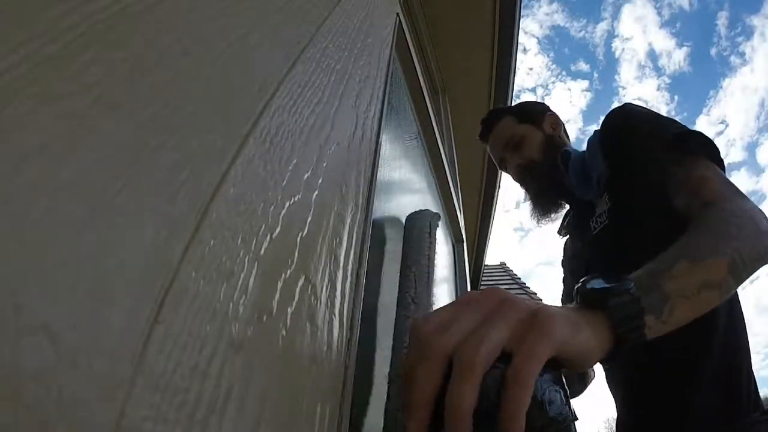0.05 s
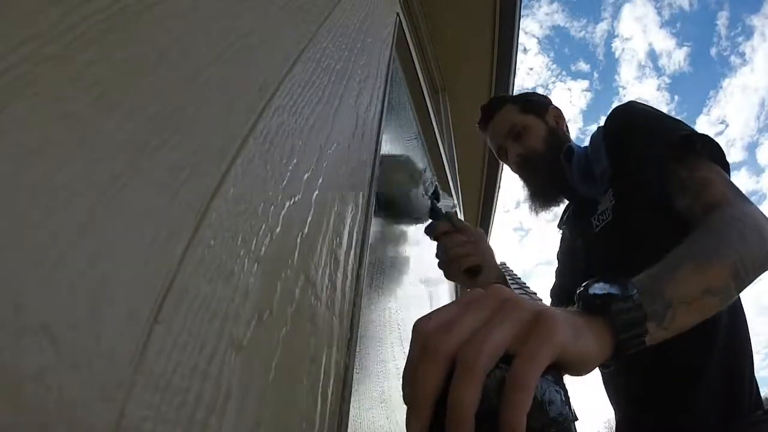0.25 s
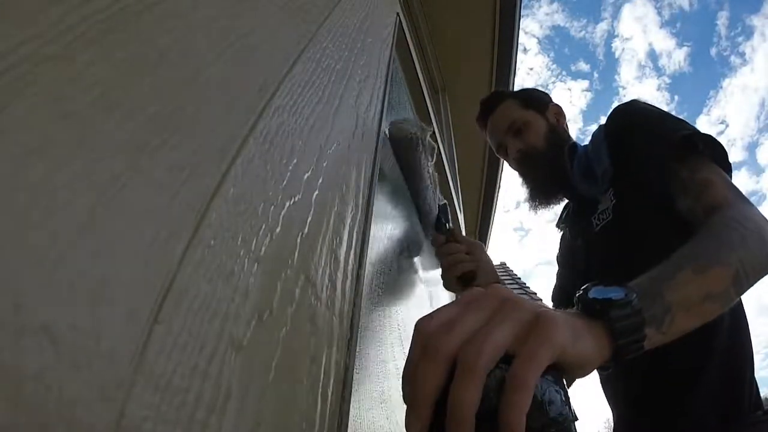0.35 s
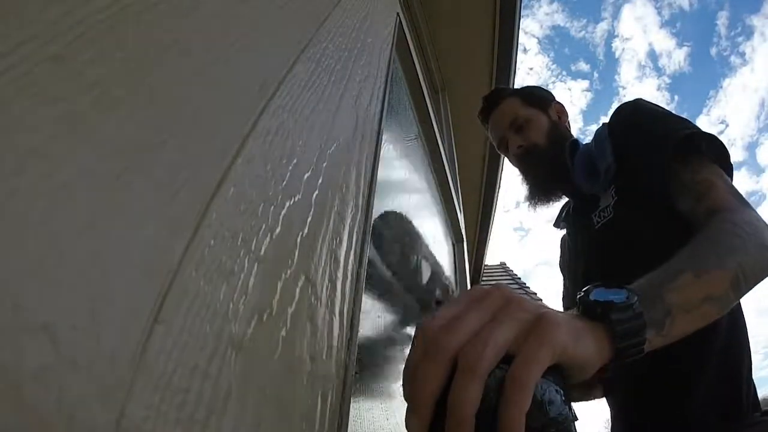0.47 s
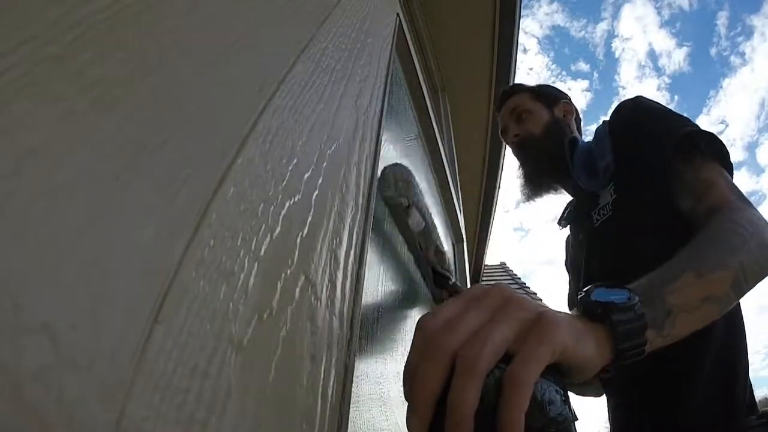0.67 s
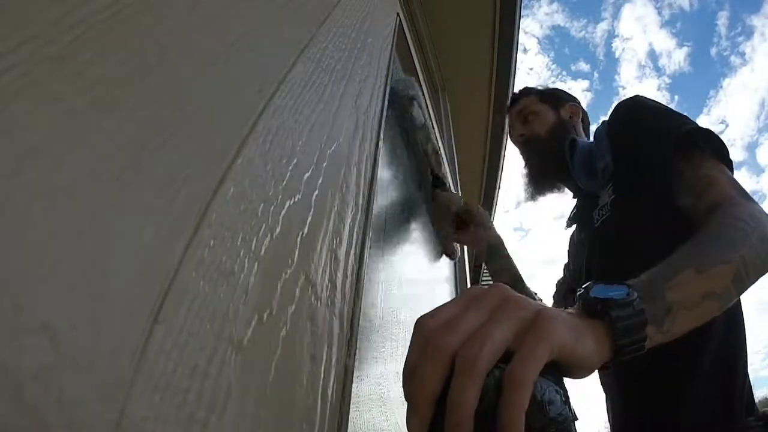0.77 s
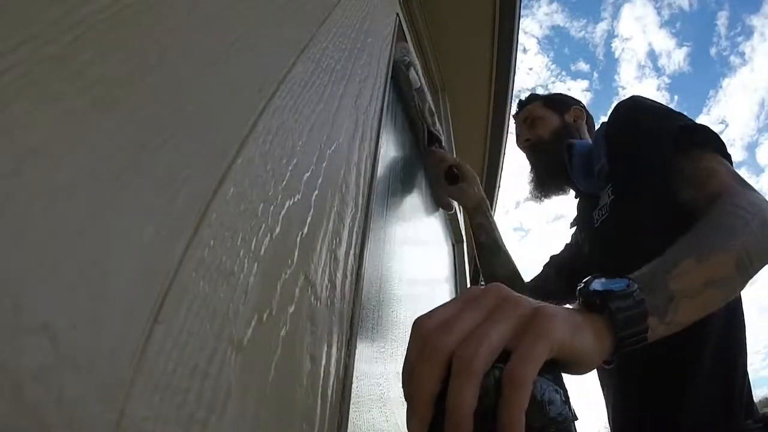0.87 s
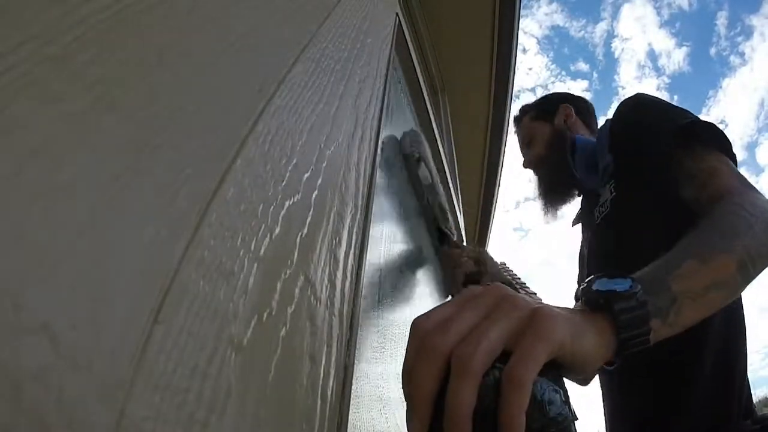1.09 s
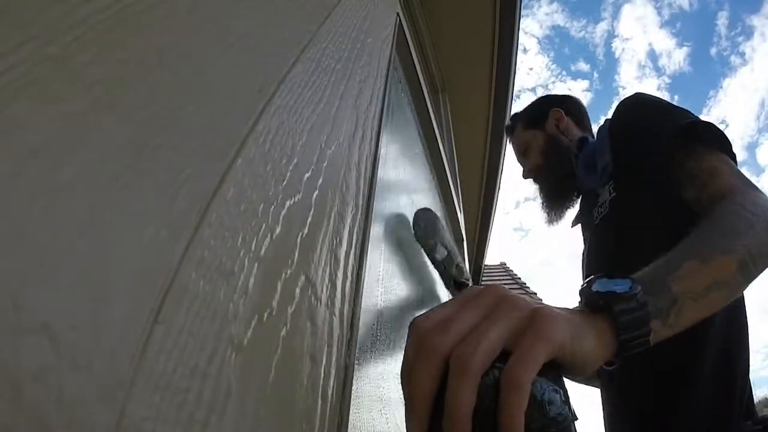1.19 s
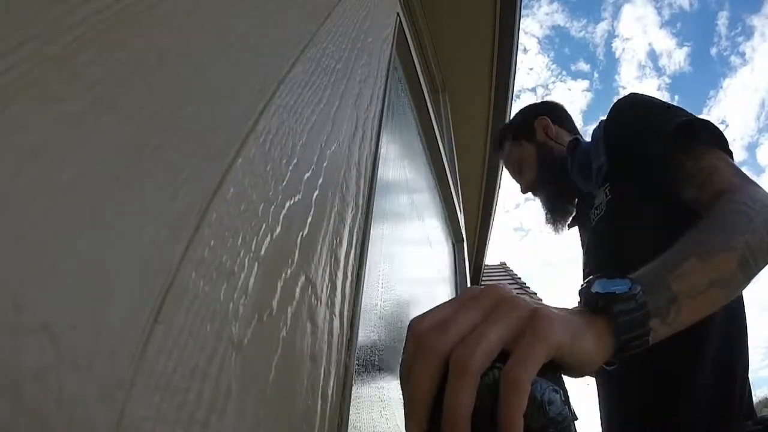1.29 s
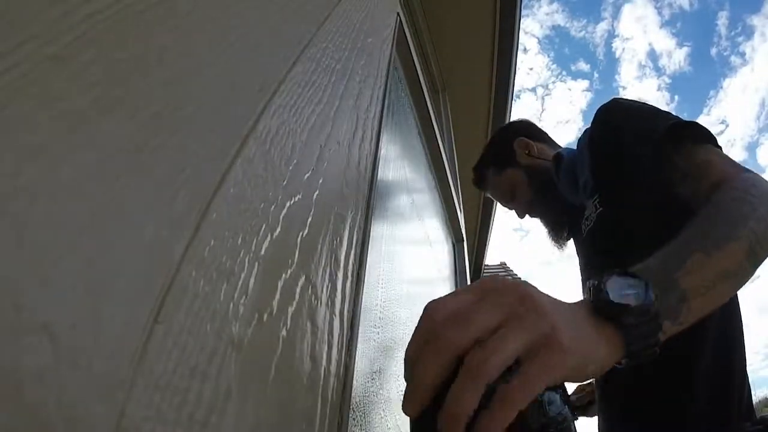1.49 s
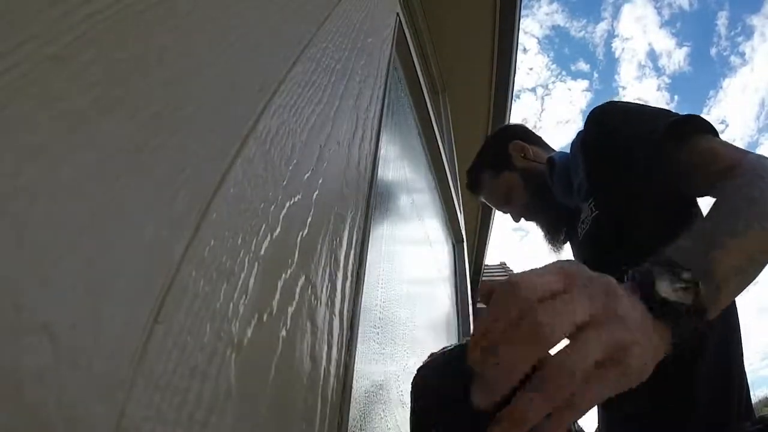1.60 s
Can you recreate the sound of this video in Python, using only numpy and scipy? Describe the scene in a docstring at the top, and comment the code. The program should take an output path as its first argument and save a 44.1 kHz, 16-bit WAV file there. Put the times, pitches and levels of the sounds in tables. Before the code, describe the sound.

Close, wet scrubbing strokes on window glass outdoors. The first swish ends in a deep thump; more strokes follow with light squeaks and low drumming, then a loud and a soft knock against the frame and one last swish.

```python
"""A wet washer pad is swept up and down a large window pane, in faint outdoor air.
From the start, friction of its fibres excites the resonances of tool and glass while the pane drums.
The first stroke squeezes out a fine spray, and its turn thumps the pane at 0.25 s. After the second
the pad glides with a thin hiss and faint squeaks, then rubs through two more strokes. Near 1.4 s the
tool knocks twice on the frame, loudly then softly, as the pane booms again; a last stroke follows."""
import sys
import numpy as np
from scipy import signal
from scipy.fft import rfft, irfft
from scipy.io import wavfile

SR = 44100
rng = np.random.default_rng(int(sys.argv[2]) if len(sys.argv) > 2 else 0)


def int16_out(signal):
    """Quantize to a 16-bit WAV file."""
    q = np.round(np.clip(np.atleast_2d(signal).T, -1, 1) * 32767)
    wavfile.write(sys.argv[1], SR, q.astype(np.int16))


N = 72765
TIME = np.arange(N) / SR

# spectrum of the outdoor air: frequency_hz, relative_db
AIR_SPECTRUM = [(20, -28), (30, -5), (42, 4.5), (55, -11.5), (70, -22), (180, -16.5), (280, -24),
                (700, -29), (1600, -30.5), (2600, -39.5), (3600, -35.5), (5000, -42), (9000, -48.5),
                (14000, -56.5)]
# envelope of the spray squeezed from the pad: time_s, level_db
SPRAY_ENVELOPE = [(0, -74), (.09, -65.5), (.2, -66), (.255, -66), (.29, -69)]
# spectrum of the spray: frequency_hz, relative_db
SPRAY_SPECTRUM = [(2500, -17.5), (5500, 3), (7000, -9), (9000, -8.5), (12500, -18), (15000, -30.5)]
# wet ticks of the pad: start_s, level_db, centre_hz, width_hz
WET_TICKS = [(0.213, -46, 4000, 3030), (0.254, -46, 2970, 3050), (0.432, -39.5, 2370, 1800),
             (.52, -47, 4400, 900), (0.955, -35.5, 2770, 1300), (1.051, -40, 3200, 1000)]
# envelope of the light sliding between strokes: time_s, level_db
GLIDE_ENVELOPE = [(.4, -62), (.53, -59), (.6, -65), (.7, -63), (.79, -64)]
# spectrum of that sliding: frequency_hz, relative_db
GLIDE_SPECTRUM = [(1500, -8), (2700, -7), (3450, 1), (4300, -11), (6000, -17.5), (12000, -43)]
# stick-slip squeaks: start_s, length_s, start_hz, end_hz, level_db
PAD_SQUEAKS = [(0.513, 0.053, 2830, 3240, -65), (0.681, 0.059, 4250, 3810, -69),
               (0.74, 0.077, 3780, 2620, -61), (0.986, 0.14, 1673, 1690, -48.5),
               (1.111, 0.0664, 1028, 912, -43.5), (1.129, 0.075, 1742, 1680, -44.5)]
# low modes of the pane: pitch_hz, boom_t60_s, pushed_db, rubbed_db
PANE_MODES = [(41.4, 0.75, -8, -3), (53.3, 0.17, -15.5, -6), (120.4, .5, -6.5, 1), (129.3, 0.7, 0, -3.5),
              (156.5, 0.53, -32.5, -2), (181, 0.23, -24.5, -2), (202.55, 0.29, -0.5, -3),
              (321, 0.09, -15.5, -22.5)]
# envelope of the rubbed pane's drumming: time_s, level_db
DRUM_ENVELOPE = [(0, -41), (.1, -37), (.18, -44.5), (.4, -38), (.63, -47.5), (.78, -59.5), (.815, -36),
                 (1.0, -34.5), (1.1, -45), (1.16, -35), (1.33, -56), (1.42, -38.5), (1.58, -38),
                 (1.65, -41.5)]
# pushes on the pane: full_force_s, level_db, rise_s
PANE_PUSHES = [(.252, -12.5, 0.052), (1.405, -24.5, 0.039)]
# shudders of the pane as the pad catches: start_s, length_s, pitch_hz, peak_db
PANE_SHUDDERS = [(.207, 0.049, 49.5, -22), (.212, 0.057, 189.3, -14), (.222, 0.088, 124.5, -10),
                 (.272, 0.033, 188, -18.5), (.797, 0.023, 196.3, -38), (1.005, 0.024, 143, -25.5),
                 (1.37, 0.029, 155.4, -24), (1.398, .042, 167.5, -25.5), (1.405, 0.14, 124.9, -19),
                 (1.565, 0.087, 121.5, -33)]
# knocks of the tool on the frame: start_s, ring_db, crack_db, rebound_db, treble_lift_db
FRAME_KNOCKS = [(1.3707, -9, -13.5, -4, -1.5), (1.4475, -30.5, -29.5, -8, 7.5)]
# modes of tool and frame: pitch_hz, relative_db, t60_s
FRAME_MODES = [(334, -22, 0.1), (487, -39, 0.16), (648, -29, 0.098), (832, -19.5, 0.12),
               (1017, -25.5, 0.18), (991, -19.5, 0.072), (1173, -7, 0.075), (1380, -9, 0.046),
               (1404, -13, 0.094), (1560, -11, 0.077), (1735, -33, 0.065), (1862, -23.5, 0.19),
               (2200, -30.5, .05), (2450, -10, 0.037), (2713, -16.5, .05), (3260, -30.5, 0.1),
               (3530, -19, .035), (4070, -42, .035)]
# spectrum of a knock's crack: frequency_hz, relative_db
CRACK_SPECTRUM = [(200, 5), (430, -19), (730, -28), (1090, 8.5), (1400, 9.5), (2000, -4), (2600, -4.5),
                  (3100, -11), (4000, -9.5), (5200, -24.5), (7000, -42), (11000, -66), (15000, -58)]
# strokes of the pad: grip (0 gliding, 1 biting), envelope of (time_s, level_db)
PAD_STROKES = [ (0.021, [(0, -52), (.04, -47.5), (.1, -43), (.19, -41), (.235, -42.5), (.255, -40),
               (.275, -56.5), (.31, -70)]), (0.75, [(.31, -59), (.355, -44.5), (.39, -45), (.425, -59),
               (.5, -78)]), (0.63, [(.792, -50), (.802, -44), (.855, -44.5), (.89, -49.5), (.93, -49),
               (.96, -42.5), (1.05, -45.5), (1.095, -53.5)]), (0.15, [(1.095, -60), (1.125, -42),
               (1.163, -42), (1.2, -58), (1.245, -52.5), (1.31, -72)]), (0.23, [(1.47, -48), (1.52, -54.5),
               (1.545, -45.5), (1.572, -44.5), (1.59, -48), (1.62, -47), (1.65, -57)])]
# resonances of the tool on the glass: pitch_hz, width_hz, gliding_db, biting_db
CONTACT_MODES = [(629, 68, -9.5, 1), (831, 52, -4.5, -0.5), (978, 23, 3.5, 2), (1255.4, 91, 2, -1),
                 (1365, 104, 1.5, 3.5), (1516, 27, -15.5, -9), (1672, 37, 5, 4), (1763, 48, 1.5, -8),
                 (2347, 104, -12.5, 5.5), (2465, 200, -14, -6.5), (2624, 85, -12.5, -3),
                 (3050, 77, -11, -7), (3200, 107, -7.5, -6.5), (3359, 101, -11.5, -1.5),
                 (4120, 110, -14.5, -19), (4440, 138, -17.5, -9), (5417, 260, -28.5, -19)]
# spectrum of the fibres' wet hiss: frequency_hz, relative_db
FIBRE_SPECTRUM = [(250, -20), (500, 24), (1500, -19), (2000, 11), (4000, 3.5), (5000, -8.5), (6500, 3.5),
                  (9000, -23.5), (15000, -41.5)]


def from_db(db):
    """Amplitude ratio of a level in decibels."""
    return 10 ** (np.asarray(db) / 20)


def unit_rms(x):
    """Normalisation to unit root-mean-square amplitude."""
    return x / np.sqrt(np.mean(x ** 2) + 1e-20)


def envelope(points):
    """Gain interpolated through (time_s, level_db) points, with a 4 ms fade beyond each end."""
    times, db = np.transpose(points)
    gate = np.interp(TIME, [times[0] - .004, times[0], times[-1], times[-1] + .004], [0, 1, 1, 0])
    return from_db(np.interp(TIME, times, db)) * gate


def colour(x, spectrum):
    """Spectral shaping through (frequency_hz, relative_db) points, at unit rms."""
    hz, db = np.transpose(spectrum)
    bins_hz = np.maximum(np.arange(N // 2 + 1) * SR / N, 1)
    gain = from_db(np.interp(np.log(bins_hz), np.log(hz), db))
    return unit_rms(irfft(rfft(x) * gain, N))


def drift(corner_hz):
    """Random fluctuation: low-passed noise of unit rms."""
    pole = np.exp(-2 * np.pi * corner_hz / SR)
    return unit_rms(signal.lfilter([1], [1, -2 * pole, pole * pole], rng.standard_normal(2 * N))[N:])


def resonate(x, hz, width_hz):
    """Forced response of a damped resonator with unit peak gain."""
    radius = np.exp(-np.pi * width_hz / SR)
    feedback = [1, -2 * radius * np.cos(2 * np.pi * hz / SR), radius * radius]
    return signal.lfilter(np.array([1, 0, -1]) * (1 - radius * radius) / 2, feedback, x)


def decay(start_s, rise_s, t60_s):
    """Exponential decay with a smooth onset."""
    age = np.maximum(TIME - start_s, 0)
    return np.sin(np.pi / 2 * np.minimum(age / rise_s, 1)) ** 2 * np.exp(-np.log(1000) * age / t60_s)


def swell(start_s, length_s):
    """Sine-squared rise and fall."""
    return np.sin(np.pi * np.clip((TIME - start_s) / length_s, 0, 1)) ** 2


def sine(start_s, hz):
    """Simple harmonic motion with zero phase at start_s."""
    return np.sin(2 * np.pi * hz * (TIME - start_s))


def outdoor_air(level_db=-50.5):
    """Stationary background noise, strongest in a low rumble."""
    return from_db(level_db) * colour(rng.standard_normal(N), AIR_SPECTRUM)


def water(tick_cutoff_hz=4500, spray_flutter_db=2):
    """Wet ticks are damped bursts of band noise; the spray is amplitude-modulated hiss."""
    ticks = 0
    for start, db, hz, width in WET_TICKS:
        band = unit_rms(resonate(resonate(rng.standard_normal(N), hz, width), hz, width))
        ticks += from_db(db) * decay(start, rise_s=.0008, t60_s=.016) * band
    fluttering = rng.standard_normal(N) * from_db(spray_flutter_db * drift(150))
    spray = envelope(SPRAY_ENVELOPE) * colour(fluttering, SPRAY_SPECTRUM)
    return spray + signal.sosfilt(signal.butter(2, tick_cutoff_hz, fs=SR, output="sos"), ticks)


def gliding(pitch_waver=.0073, roughness_db=2):
    """Friction under light pressure gives a thin hiss; stick-slip oscillation adds faint squeaks."""
    out = envelope(GLIDE_ENVELOPE) * colour(rng.standard_normal(N), GLIDE_SPECTRUM)
    for start, length, start_hz, end_hz, db in PAD_SQUEAKS:
        hz = np.interp(TIME, [start, start + length], [start_hz, end_hz]) * (1 + pitch_waver * drift(230))
        amplitude = from_db(db + roughness_db * drift(120)) * swell(start, length)
        out += amplitude * np.sin(2 * np.pi * np.cumsum(hz) / SR)
    return out


def pane():
    """Plate vibration: the pane drums when rubbed, rings freely when pushed, shudders as the pad catches."""
    drum = boom = 0
    for hz, t60, pushed_db, rubbed_db in PANE_MODES:
        width = np.log(1000) / (np.pi * t60)
        ringing = resonate(resonate(rng.standard_normal(2 * N), hz, 2 * width), hz, 5 * width)[N:]
        drum += from_db(rubbed_db) * unit_rms(ringing)
        for full_force, db, rise in PANE_PUSHES:
            boom += from_db(db + pushed_db) * decay(full_force - rise, rise, t60) * sine(full_force, hz)
    shudder = sum(from_db(db) * swell(start, length) * sine(start, hz)
                  for start, length, hz, db in PANE_SHUDDERS)
    return envelope(DRUM_ENVELOPE) * unit_rms(drum) + boom + shudder


def knocks(rebound_s=.0043, contact_s=.00033, spread_db=1, tail_db=-21):
    """Impact and rebound each crack and excite the frame's modes; a short tail lingers under the eaves."""
    out = np.zeros(N)
    for first, ring_db, crack_db, rebound_db, lift_db in FRAME_KNOCKS:
        for start, db in ((first, 0), (first + rebound_s, rebound_db)):
            strikes_db = rng.normal(ring_db, spread_db, len(FRAME_MODES))
            ring = sum(from_db(mode_db + strike_db) * decay(start, contact_s, t60) * sine(start, hz)
                       for (hz, mode_db, t60), strike_db in zip(FRAME_MODES, strikes_db))
            burst = decay(start, contact_s, t60_s=.034)
            tail = from_db(tail_db) * decay(start, rise_s=.01, t60_s=.2)
            crack = colour(rng.standard_normal(N), CRACK_SPECTRUM)
            crack = colour(crack, [(2900, 0), (5900, lift_db)])  # treble shelf
            out += from_db(db) * (ring + from_db(crack_db) * (burst + tail) * crack)
    return out


def rubbing(slips_per_s=1800, spread_db=1, smooth_gain=.46, flutter_db=2, hiss_db=-16.5):
    """Frictional excitation: tiny slips of wet fibres drive tool and glass; grip weights the modes."""
    sizes = from_db(spread_db * np.minimum(rng.exponential(1, N), 4)) * rng.choice([-1, 1], N)
    slips = unit_rms(sizes * (rng.random(N) < slips_per_s / SR))
    friction = slips + smooth_gain * rng.standard_normal(N)
    friction *= from_db(flutter_db * drift(210))
    modes = np.array([resonate(resonate(friction, hz, 4 * width), hz, width)
                      for hz, width, _, _ in CONTACT_MODES])
    _, _, gliding_db, biting_db = np.transpose(CONTACT_MODES)
    hiss = from_db(hiss_db) * colour(friction, FIBRE_SPECTRUM)
    out = np.zeros(N)
    for grip, points in PAD_STROKES:
        weights = from_db(gliding_db + grip * (biting_db - gliding_db))
        out += envelope(points) * (unit_rms(weights @ modes) + hiss)
    return out


def scene():
    """Superposition of all sources at one close microphone."""
    return (rubbing() + gliding() + pane() + knocks() + water() + outdoor_air())[None]


def record(dry, low_cut_hz=20.3, stopband_hz=15800):
    """Band limiting removes the deepest bass and the highest treble."""
    thinned = signal.sosfilt(signal.butter(4, low_cut_hz, "high", fs=SR, output="sos"), dry)
    return signal.sosfilt(signal.cheby2(12, 70, stopband_hz, fs=SR, output="sos"), thinned)


dry = scene()
out = record(dry)
int16_out(out)
```